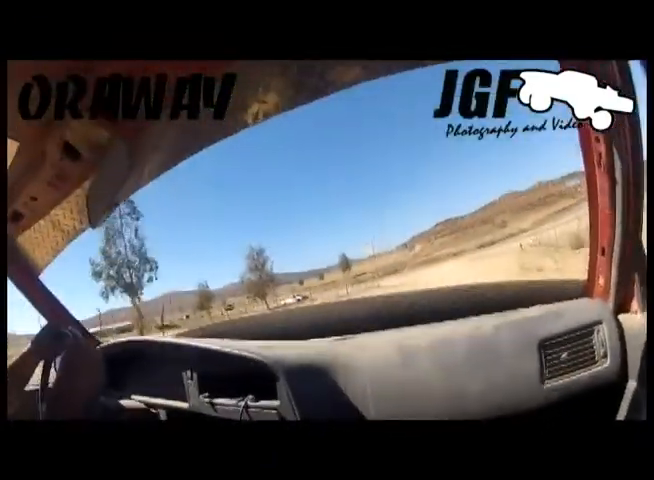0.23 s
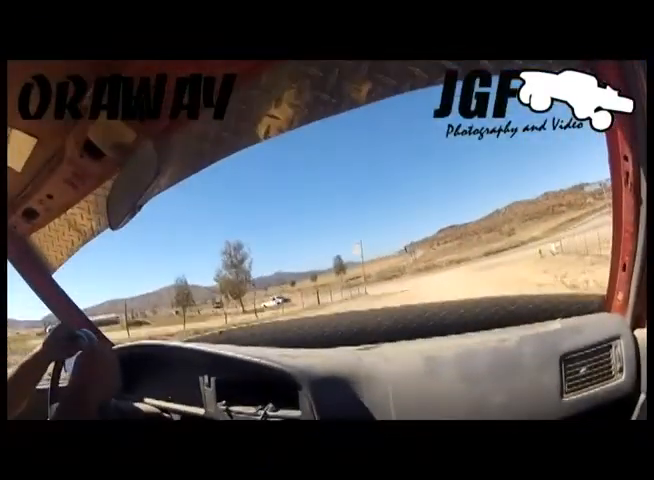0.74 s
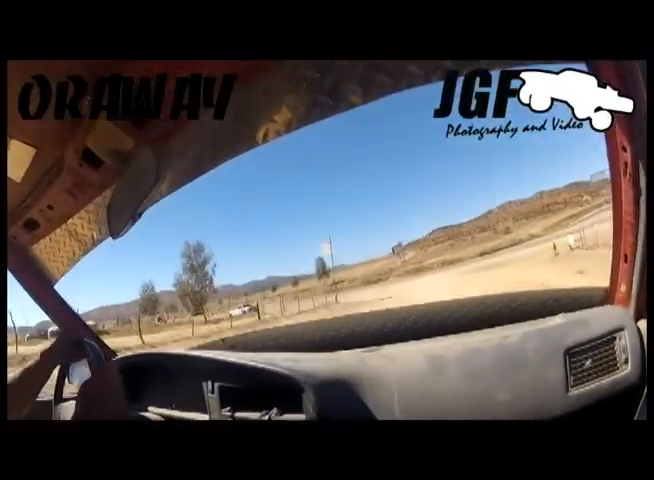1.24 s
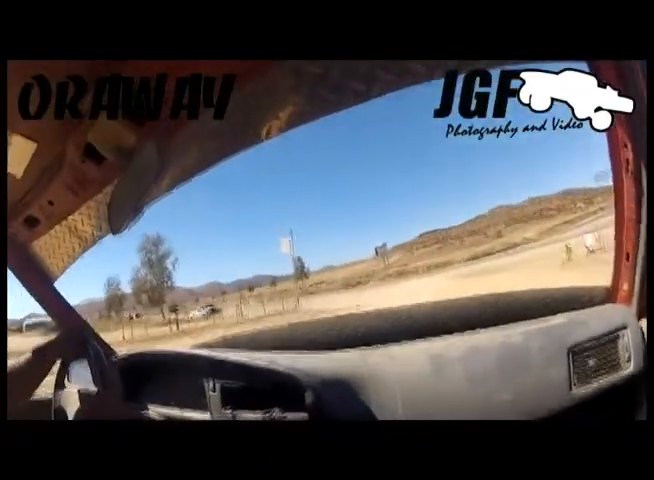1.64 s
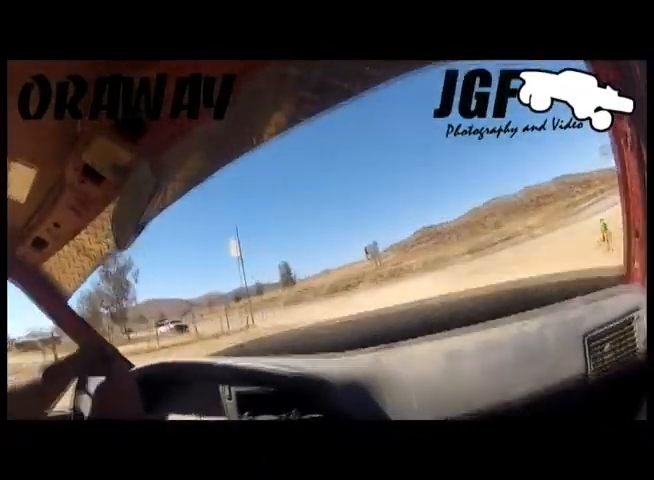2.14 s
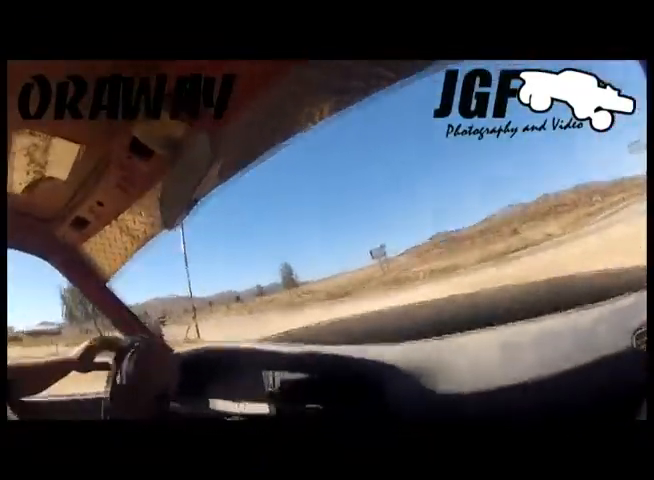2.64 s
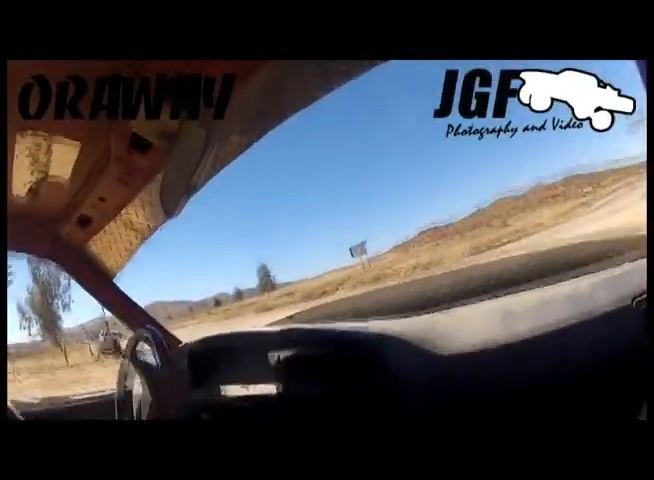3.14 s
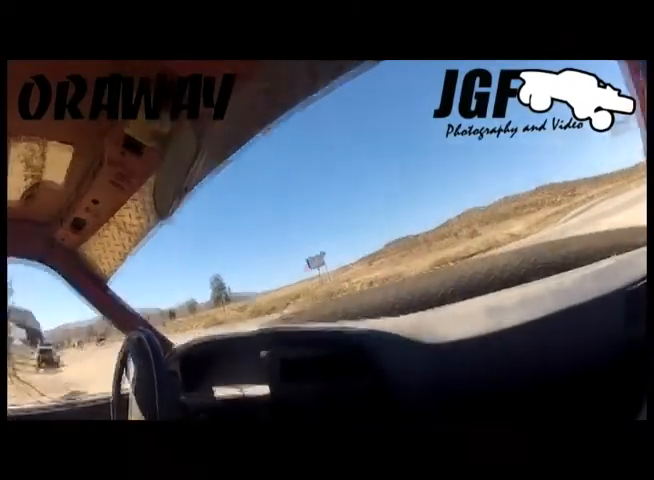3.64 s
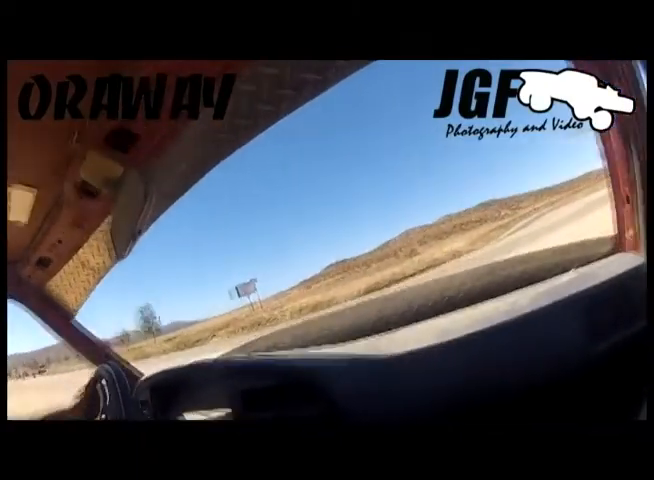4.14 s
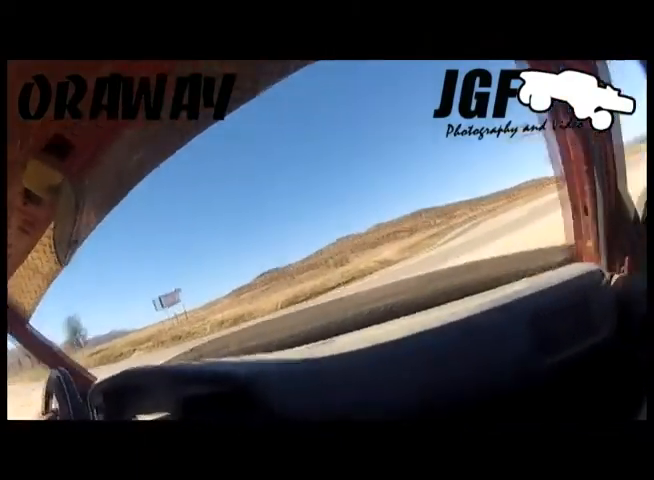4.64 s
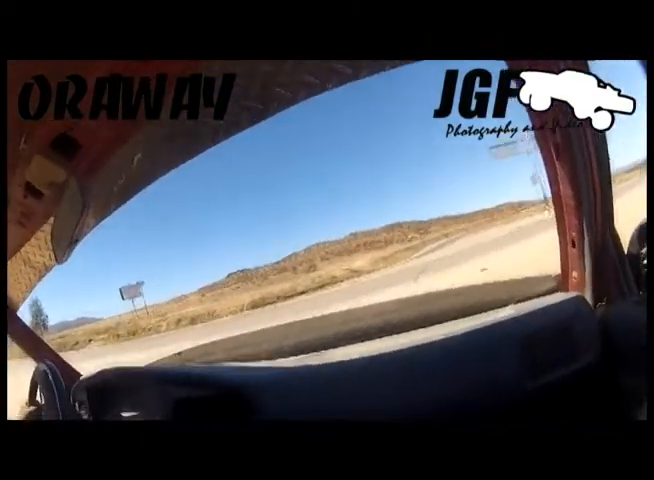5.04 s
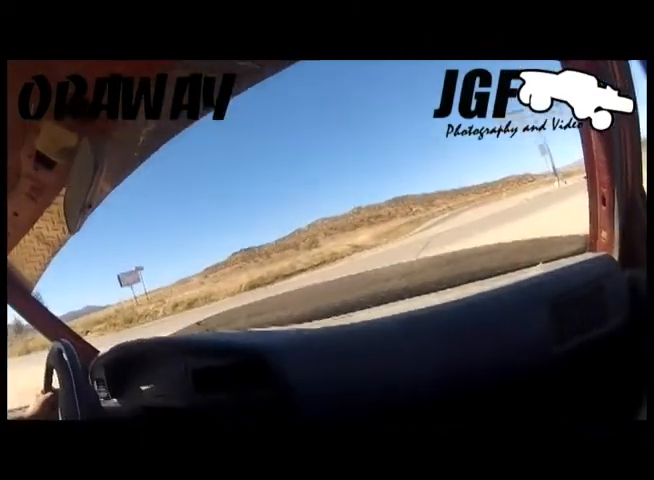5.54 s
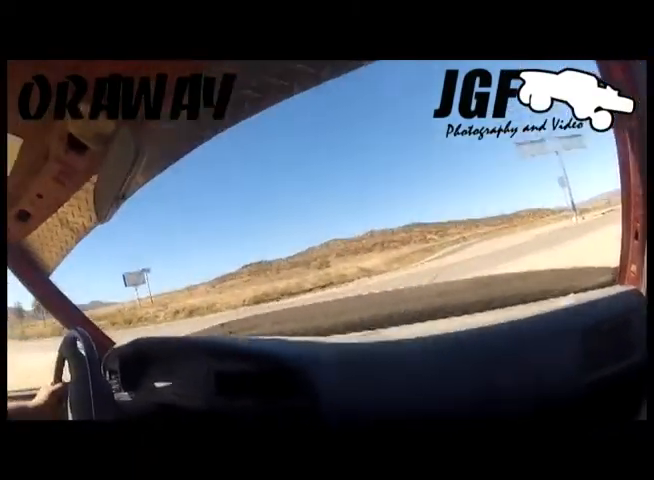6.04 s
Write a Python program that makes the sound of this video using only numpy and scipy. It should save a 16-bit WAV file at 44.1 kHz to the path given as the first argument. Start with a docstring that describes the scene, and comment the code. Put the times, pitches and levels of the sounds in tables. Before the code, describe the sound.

An off-road truck's eight-cylinder engine is heard from inside its bare cab, a deep, uneven boom that starts almost at once and dominates all six seconds. Light valve clatter and a faint drive line hum sit beneath it. For the first 2.5 seconds the dirt road thuds and rumbles under the tyres, and loose panels rattle at a quick string of bumps. The revs sink steadily until about 3.7 seconds and the shaking calms as the truck slows. From about 2.2 seconds fittings give short, high squeaks, the clearest near 2.5 seconds, with fainter ones continuing to the end. A joint creaks briefly near 2.9 and 4.6 seconds. Grit ticks on the body now and then from 3.7 seconds, most sharply near 3.7, 4.2 and 6.1 seconds. The revs lift once between 4 and 5 seconds, then sink to a slow, low throb.

```python
"""An eight-cylinder off-road truck, heard from its bare cab as it slows down on a dirt road.
The cylinders fire unevenly and their pulses boom through exhaust and cab; the revs sink, lift once, sink.
Underneath, the road thuds, rumbles and shakes loose panels, the valve gear clatters, the drive line hums.
Fittings squeak, a joint creaks and grit ticks on the body.
A converter holds each sample for 1/12000 s, which mirrors the treble."""
import sys
import numpy as np
from scipy import signal
from scipy.fft import rfft, irfft
from scipy.io import wavfile
from scipy.ndimage import uniform_filter1d

SR = 44100
rng = np.random.default_rng(int(sys.argv[2]) if len(sys.argv) > 2 else 0)


def bounce(signal):
    """Save signal as a 16-bit WAV file at the path given by the first command-line argument."""
    frames = np.transpose(np.atleast_2d(signal))
    limited = np.clip(frames, -1, 1)
    pcm = np.round(limited * 32767).astype(np.int16)
    wavfile.write(sys.argv[1], SR, pcm)


N = 277477


def from_db(db):
    """Gain of a level in dB."""
    return 10 ** (np.asarray(db) / 20)


def rms_one(x):
    """Scaled to rms 1."""
    return x / np.sqrt(np.mean(x ** 2) + 1e-20)


def automation(rows):
    """One curve per column after the time column, sample by sample."""
    s, *columns = np.transpose(rows)
    return [np.interp(np.arange(N) / SR, s, c) for c in columns]


def colour(x, points):
    """EQ through points of (Hz, dB)."""
    hz, db = np.transpose(points)
    grid = np.maximum(np.arange(N // 2 + 1) * SR / N, 1)
    return irfft(rfft(x) * from_db(np.interp(np.log(grid), np.log(hz), db)), N)


def resonance(x, hz, width_hz):
    """Two-pole band-pass, gain 1 at its peak."""
    r = np.exp(-np.pi * width_hz / SR)
    poles = [1, -2 * r * np.cos(2 * np.pi * hz / SR), r * r]
    return signal.lfilter((1 - r * r) / 2 * np.array([1, 0, -1]), poles, x + 1e-18)


def modes(x, table):
    """Parallel resonances of (Hz, width in Hz, dB)."""
    return sum(from_db(db) * resonance(x, hz, width) for hz, width, db in table)


def drift(rate_hz):
    """Smooth random wander of rms 1."""
    r = np.exp(-2 * np.pi * rate_hz / SR)
    return rms_one(signal.lfilter([1], [1, -2 * r, r * r], rng.standard_normal(N + SR))[SR:])


def grains(spread_db):
    """Dense contacts of uneven size and random sign."""
    return rms_one(rng.standard_normal(N) * from_db(spread_db * np.minimum(rng.exponential(1, N), 6)))


# The revs. Each row: time in seconds, four-stroke cycles per second.
REVS = [(0.0, 13.773), (1.5, 12.29), (2.0, 11.31), (2.8, 9.39), (3.4, 8.4), (3.7, 8.09), (3.9, 8.12),
        (4.1, 8.39), (4.3, 9.04), (4.5, 9.52), (4.9, 10.36), (5.05, 10.27), (5.35, 8.84), (5.5, 8.35),
        (5.8, 7.75), (6.29, 7.38)]
def cycles():
    """Four-stroke cycles turned since the start."""
    return np.cumsum(automation(REVS)[0]) / SR


# Valve events. Each row: place in the cycle from 0 to 1, tap accent in dB, hum accent in dB.
VALVES = [(.07, -5, -2), (.31, -1, -13), (.54, -1.5, 0.5), (.81, -4, -21)]
def valve_swells():
    """A smooth swell per valve event in every cycle: one set for the taps, one for the hum."""
    phase = cycles() % 1
    place, tap_db, hum_db = np.transpose(VALVES)[:, :, None]
    swells = np.exp(-((phase - place) / 0.081) ** 2)
    return from_db(tap_db) * swells, from_db(hum_db) * swells


def drive_line_hum(hz=311.4, width_hz=121):
    """A band of noise with a firmer tone inside, swelling with the valve events."""
    _, swells = valve_swells()
    pulsing = rng.standard_normal(N) * (0.93 + swells.sum(axis=0))
    hum = resonance(resonance(pulsing, hz, width_hz), hz, 2 * width_hz)
    core = resonance(hum, hz, width_hz=13)
    return rms_one(hum) * from_db(-62) + rms_one(core) * from_db(-71)


# The ring of the valve gear. Each row: pitch in Hz, width in Hz, gain in dB.
CLATTER_MODES = [(1360, 153, 1), (2135, 48, -3.5), (2520, 44, 2.5), (2866, 296, -1), (3566, 360, -2.5),
                 (4250, 310, -13.5), (5500, 270, -16.5)]
def valve_clatter(level_db):
    """Dense contacts swell at each valve event, by a fresh random amount in each resonance."""
    cycle, out = cycles().astype(int), 0
    taps, _ = valve_swells()
    for hz, width, db in CLATTER_MODES:
        accents = from_db(7.7 * rng.standard_normal((cycle[-1] + 1, len(VALVES))))
        envelope = 1.53 + (taps * accents[cycle].T).sum(axis=0)
        out += from_db(db) * resonance(grains(spread_db=1.5) * envelope, hz, width)
    return rms_one(out) * from_db(level_db)


# Bumps in the road. Each row: start in seconds, level in dB, dying time in seconds.
BUMPS = [(0.1257, -40.5, 0.026), (0.163, -31, 0.0072), (0.187, -32.5, 0.021), (0.238, -35, 0.012),
         (0.264, -44.5, 0.037), (0.3133, -37.5, 0.0079), (0.3505, -43, 0.082), (0.428, -44.5, 0.04),
         (0.572, -41, 0.013), (0.662, -41, 0.017), (0.711, -39, 0.026), (0.783, -62, 0.0079),
         (0.81, -36.5, 0.013), (0.844, -45.5, 0.028), (0.861, -35.5, 0.016), (0.941, -44, 0.044),
         (0.979, -40.5, 0.04), (1.116, -41, 0.013), (1.1788, -35.5, 0.0066), (1.217, -42.5, 0.051),
         (1.3215, -40.5, 0.0077), (1.409, -45, 0.035), (1.4966, -43, 0.013), (1.62, -38, 0.02),
         (1.685, -41, 0.022), (1.75, -42.5, 0.012), (1.839, -45, 0.021), (1.917, -48, 0.012),
         (2.003, -37.5, 0.014), (2.125, -49, 0.016), (2.2495, -48, 0.024), (2.33, -55, 0.022),
         (2.434, -59, 0.015), (3.55, -70, 0.023), (4.055, -66, 0.022), (4.78, -68, 0.012),
         (4.851, -62, 0.0081), (5.319, -57, 0.014), (5.573, -60, 0.012), (5.74, -62.5, 0.024)]
def bump_jolts():
    """Envelope of the bumps: quick rise, a short plateau of rattling, then a fall."""
    out, age = np.zeros(N), np.arange(SR // 5) / SR
    attack = 1 - np.exp(-age / 0.00062)
    for s, db, dying in BUMPS:
        i = round(s * SR)
        out[i:i + len(age)] += from_db(db) * attack * np.exp(-(age / dying) ** 5.9)
    return out


# The low end of the road. Each row: frequency in Hz, gain in dB.
THUD_EQ = [(10, -22), (22, -4), (32, 8), (45, 8), (75, 15), (110, -10), (200, -57)]
def road_thud(shake_db):
    """Deep, wavering noise from below that follows the shaking of the chassis."""
    noise = rms_one(colour(rng.standard_normal(N), THUD_EQ))
    return noise * from_db(-36 + 1.57 * shake_db + 3.7 * drift(15.0))


# The tone of the tyres. Each row: frequency in Hz, gain in dB.
RUMBLE_EQ = [(50, 1), (90, 2.5), (140, 1), (200, -2.5), (300, -7.5), (420, -12.5), (600, -19), (900, -56)]
def tyre_rumble(level_db, lumps, jolts):
    """Tyres on dirt: dark, fluttering noise that jumps at each bump."""
    noise = rms_one(colour(rng.standard_normal(N), RUMBLE_EQ))
    return noise * (from_db(level_db + 2.3 * drift(17.6) + 0.5 * lumps) + 0.57 * jolts)


# The ring of the panels. Each row: pitch in Hz, width in Hz, gain in dB.
PANEL_MODES = [(708, 200, 0.5), (2256, 410, -0.5), (2800, 46, -35), (5520, 67, 1)]
# Their overall tone. Each row: frequency in Hz, gain in dB.
PANEL_EQ = [(240, -48), (400, -2.5), (485, -4), (746, -1.5), (936, -3.5), (1010, -6.5), (1410, -7),
            (1580, -8), (1730, -7), (2320, -1), (2620, -4), (2940, -3), (5010, -15.5), (5540, -14.5),
            (6000, -16), (7800, -60), (13200, -120)]
def panel_buzz(shake_db, lumps, jolts):
    """Loose panels chatter as the chassis shakes and rattle hard at the bumps."""
    contacts = grains(spread_db=2.0) * from_db(3.07 * drift(82))
    buzz = rms_one(colour(contacts + modes(contacts, PANEL_MODES), PANEL_EQ))
    return buzz * (from_db(-40 + 1.24 * shake_db + 0.33 * lumps) + jolts)


# Faders of the ride. Each row: time in seconds, tyre rumble in dB, engine-bay clatter in dB.
RIDE_LEVELS = [(.125, -36.5, -56.5), (.7, -38.5, -46.5), (1.25, -41, -55.5), (1.55, -43.5, -55),
               (1.72, -43, -54), (1.8, -49, -53), (1.87, -42, -54.5), (2.5, -46.5, -55.5),
               (3, -53.5, -56.5), (4.5, -55, -59), (5.5, -58.5, -61), (6.29, -56.5, -67)]
def ride():
    """The bed of road and machine noise, calming as the truck slows."""
    rumble_db, clatter_db = automation(RIDE_LEVELS)
    shake_db = rumble_db + 37    # chassis shaking, near 0 dB at the start
    jolts, lumps = bump_jolts(), drift(9.6)
    road = road_thud(shake_db) + tyre_rumble(rumble_db, lumps, jolts) + panel_buzz(shake_db, lumps, jolts)
    return road + valve_clatter(clatter_db) + drive_line_hum()


# The louder squeaks. Each row: start in seconds, level in dB, pitch in Hz.
SQUEAKS = [(2.205, -49, 3800), (2.4575, -35.5, 3780), (2.555, -47.5, 3760), (2.6165, -42.5, 3640),
           (2.682, -44.5, 3690), (2.752, -46.5, 2740), (2.967, -51, 2470), (3.3154, -49, 3030),
           (3.458, -42.5, 3730), (3.818, -50, 3620), (5.2091, -53, 2480), (5.435, -46.5, 2450),
           (5.552, -45.5, 2450), (5.742, -55, 2540), (5.931, -50, 2330), (6.03, -50, 2540)]
def fitting_squeaks(faint_from_s=3, faint_per_s=11):
    """A fitting rubs: a gritty catch, then a wavering tone. Faint ones join once the road is calm."""
    out, age = np.zeros(N + SR), np.arange(SR // 20) / SR
    span = N / SR - faint_from_s
    faint = [(faint_from_s + span * when, -58 + 5 * loud, 2520 * (1 + 0.098 * (2 * high - 1)))
             for when, loud, high in rng.random((int(faint_per_s * span), 3))]
    envelope = (1 - np.exp(-age / 0.00076)) * np.exp(-(age / 0.016) ** 2)
    for s, db, hz in list(SQUEAKS) + faint:
        i = round(s * SR)
        jitter, rub = rng.standard_normal((2, len(age)))
        waver = 0.11 * np.cumsum(uniform_filter1d(jitter, size=40))
        phase = 2 * np.pi * hz * age
        tone = np.sin(phase + waver) + .2 * np.sin(1.45 * phase + waver) + .25 * rub
        catch = 0.59 * np.diff(rub, prepend=0) * np.exp(-age / 0.011)
        out[i:i + len(age)] += from_db(db) * (tone * envelope + catch)
    return out[:N]


# The ring of the joint. Each row: pitch in Hz, width in Hz, gain in dB.
JOINT_MODES = [(1410, 93, -5.5), (2870, 630, 1.5), (3740, 200, -0.5), (5300, 370, -15)]
# Its creaks. Each row: start in seconds, peak in dB, length in seconds.
CREAKS = [(2.867, -35.5, 0.018), (2.896, -36, 0.034), (2.911, -39, 0.037), (2.965, -35.5, 0.033),
          (4.613, -42, 0.018), (4.631, -36.5, 0.024), (4.658, -39, 0.013)]
def joint_creaks(slips_per_s=1426):
    """Nearly regular slips of uneven size swell and fade, ringing the joint."""
    out, age = np.zeros(N), np.arange(SR // 20) / SR
    for s, peak_db, length in CREAKS:
        i = round(s * SR)
        jitter, rough = rng.standard_normal((2, len(age)))
        slip_count = np.floor(np.cumsum(slips_per_s * (1 + .4 * jitter)) / SR)
        slips = np.diff(slip_count, prepend=0) > 0
        swell = np.sin(np.pi * np.minimum(age / length, 1))
        creak = modes((slips * (1 + 0.23 * rough) + 0.052 * rough) * swell, JOINT_MODES)
        out[i:i + len(age)] += from_db(peak_db) * creak / np.abs(creak).max()
    return out


# The ring of the truck's body. Each row: pitch in Hz, gain in dB, seconds to fall by 60 dB.
BODY_MODES = [(1320, 5, 0.0074), (1830, -3.5, 0.015), (2790, 9, 0.0048), (3120, -10.5, 0.015),
              (3240, -5, 0.012), (4340, 1, 0.0096)]
# Hits of grit. Each row: start in seconds, peak in dB, brightness as a low-pass cutoff in Hz.
TICKS = [(3.696, -27, 6000), (3.7017, -36, 4000), (3.8499, -31, 1630), (4.2, -29, 5960),
         (4.288, -32.5, 1700), (4.433, -38.5, 5000), (4.799, -36.5, 3020), (4.812, -44, 2500),
         (6.0721, -27, 7000), (6.187, -36.5, 1960)]
def grit_ticks(dull_hz=1420, ring_per_octave=0.58):
    """Grit strikes the body: dull hits mostly click, harder and brighter ones ring it."""
    out, age = np.zeros(N), np.arange(SR // 20) / SR
    click = np.exp(-((age - .0003) / 0.000063) ** 2)
    for s, peak_db, bright_hz in TICKS:
        i, signs = round(s * SR), rng.choice([-1, 1], len(BODY_MODES))
        hardness = max(ring_per_octave * np.log2(bright_hz / dull_hz), 0)
        ring = sum(sign * from_db(db - 60 * age / t60) * np.sin(2 * np.pi * hz * age)
                   for sign, (hz, db, t60) in zip(signs, BODY_MODES))
        strike = hardness * ring / 2 + (1 - min(hardness, 1)) * click
        tick = signal.lfilter(*signal.butter(2, bright_hz, fs=SR), strike)
        out[i:i + len(age)] += from_db(peak_db) * tick / np.abs(tick).max()
    return out


# The lope of the engine. Each entry: a cylinder's offset from the base strength, in firing order.
CYLINDERS = [1.35, 1.4, 2.3, 2.5, -5.3, -5.5, -1.5, 4.7]
# How firings reach the cab. Each row: cycles per second, base strength, unevenness, bank imbalance.
FIRING = [(7.4, 4.5, 0.88, .1), (8.1, 4.85, 0.7, 0.12), (8.9, 6.9, 0.74, 0.092), (9.5, 4.3, 1.05, 0.089),
          (10.2, 1.3, 1.42, 0.11), (10.8, 1.5, 0.73, 1.5), (12.2, 2.4, .85, 2.4), (12.7, 4, 1.7, 5.8),
          (13.8, 3.5, 4.1, 8.3)]
# The tone of the firings: the deepest lows stay weak, and the muffler dulls them above 85 Hz. Each row:
# frequency in Hz, gain in dB.
MUFFLER_EQ = [(14, -26), (24, -9), (33, 3), (85, -0.5), (130, -21.5), (300, -52)]
# The boom of the cab. Each row: pitch in Hz, width in Hz, gain in dB.
CAB_MODES = [(63.6, 10.5, 0), (30, 28, 8.5)]
def engine():
    """One pulse per firing, eight to a cycle, through muffler, cab and the resonance of the exhaust."""
    count = (8 * cycles()).astype(int)
    fires = np.flatnonzero(np.diff(count)) + 1
    cylinder = count[fires] % 8
    revs = automation(REVS)[0][fires]
    speeds, *columns = np.transpose(FIRING)
    base, uneven, imbalance = (np.interp(revs, speeds, c) for c in columns)
    imbalance *= from_db(3.8 * drift(5.7)[fires])    # left bank against right: it comes and goes
    pulses = np.zeros(N)
    pulses[fires] = base + uneven * np.array(CYLINDERS)[cylinder] + imbalance * (-1.) ** cylinder
    pulses[fires] += .25 * rng.standard_normal(len(fires))    # no two burns alike
    boom = modes(colour(pulses, MUFFLER_EQ), CAB_MODES)
    return from_db(-5.5) * resonance(boom, hz=35, width_hz=31)    # exhaust


def scene():
    """Everything in the cab, mixed to mono."""
    return (engine() + ride() + fitting_squeaks() + joint_creaks() + grit_ticks())[None]


def record(dry, silence_s=.1245, converter_edge_hz=5850, top_hz=15280):
    """A short silence, then the mix held in 12 kHz steps, which mirrors the treble; the top is cut."""
    gated = dry * (np.arange(N) >= silence_s * SR)
    narrow = signal.sosfilt(signal.butter(8, converter_edge_hz, fs=SR, output="sos"), gated)
    samples = signal.resample_poly(narrow, 40, 147, axis=1)    # down to 12 kHz
    steps = np.repeat(samples, 15, axis=1)
    mirrored = signal.resample_poly(steps, 49, 200, axis=1)[:, :N]    # back to SR
    return signal.sosfilt(signal.ellip(10, .5, 50, top_hz, fs=SR, output="sos"), mirrored)


dry = scene()
out = record(dry)
bounce(out)
```